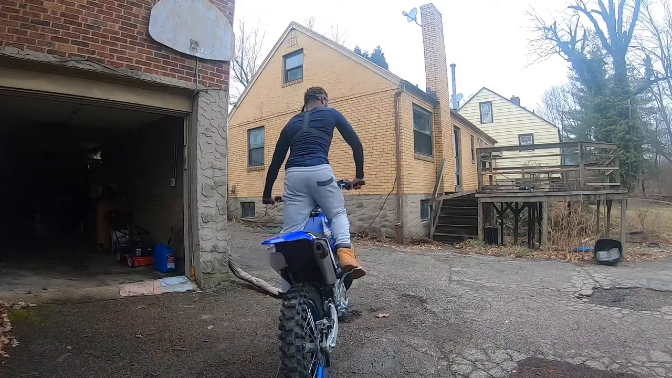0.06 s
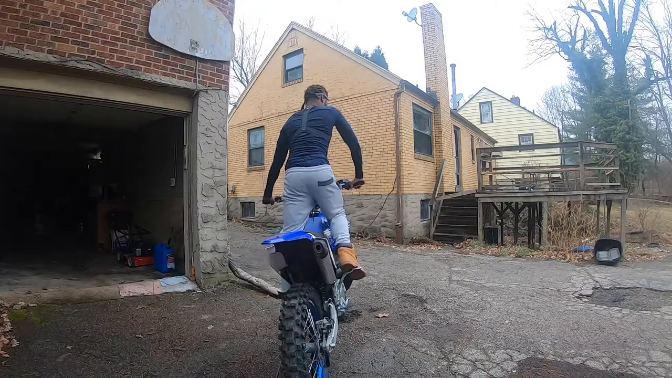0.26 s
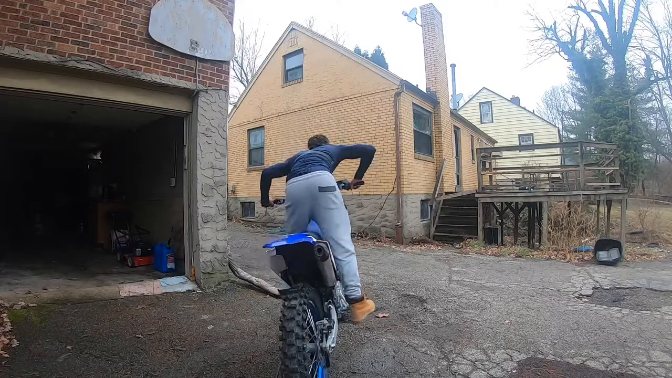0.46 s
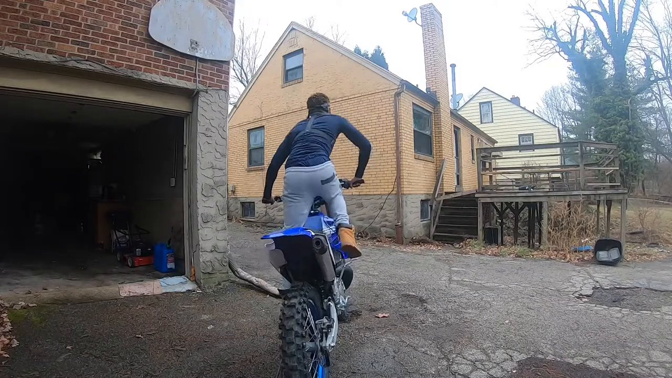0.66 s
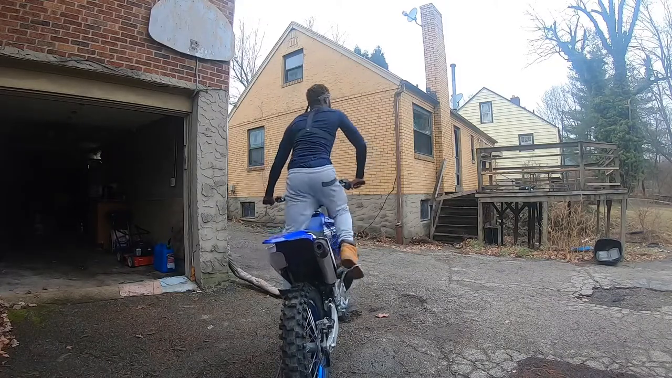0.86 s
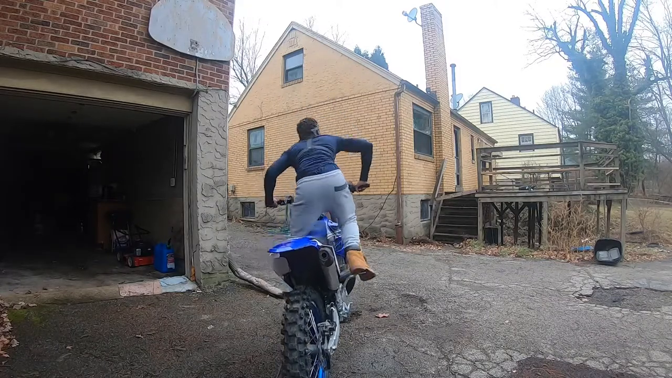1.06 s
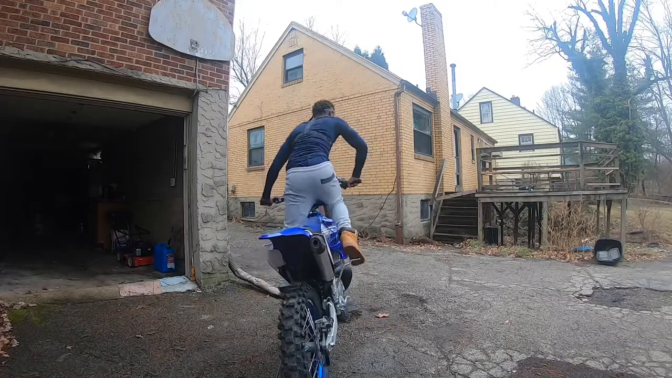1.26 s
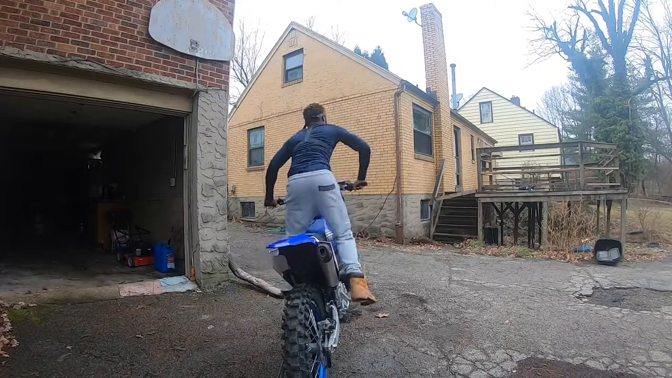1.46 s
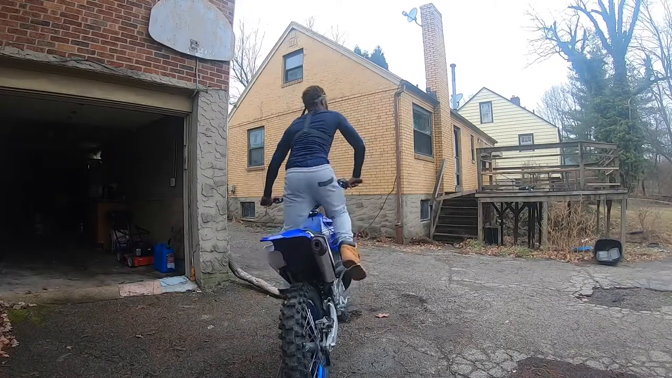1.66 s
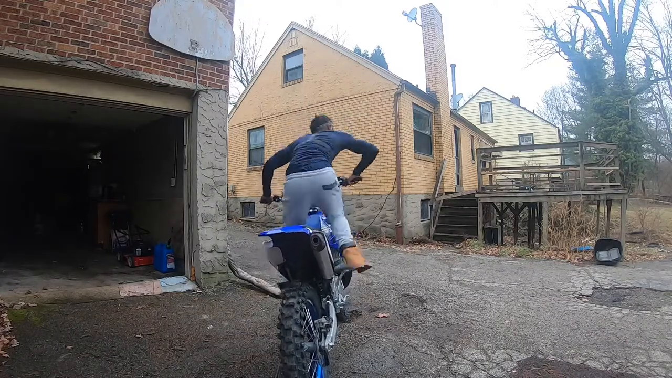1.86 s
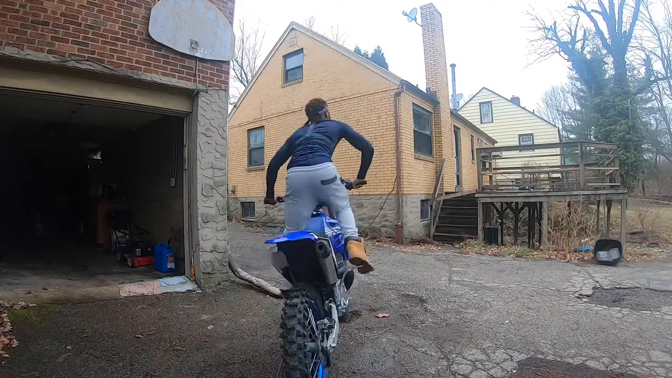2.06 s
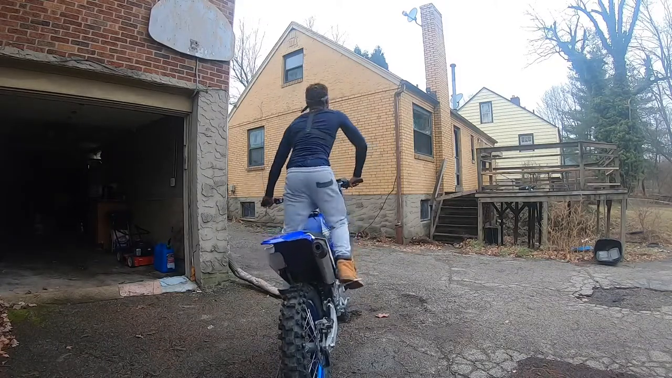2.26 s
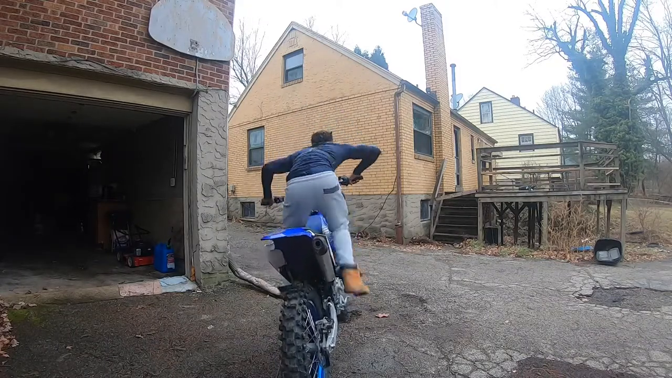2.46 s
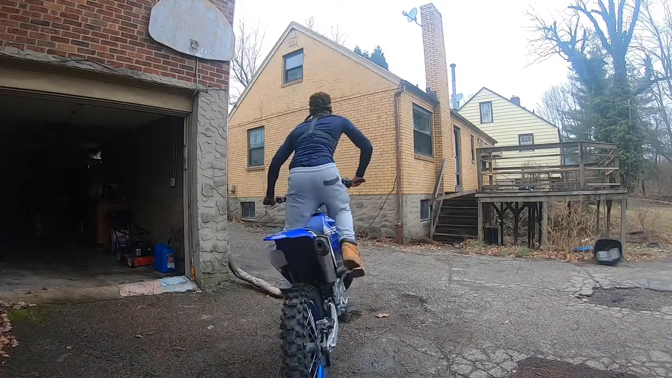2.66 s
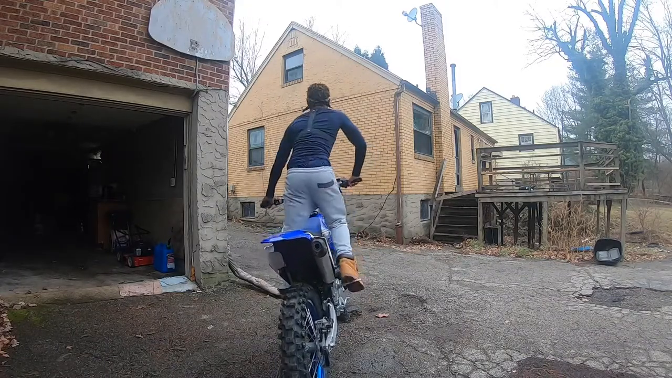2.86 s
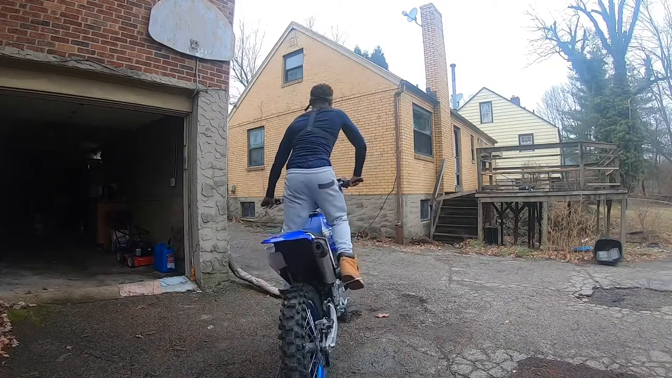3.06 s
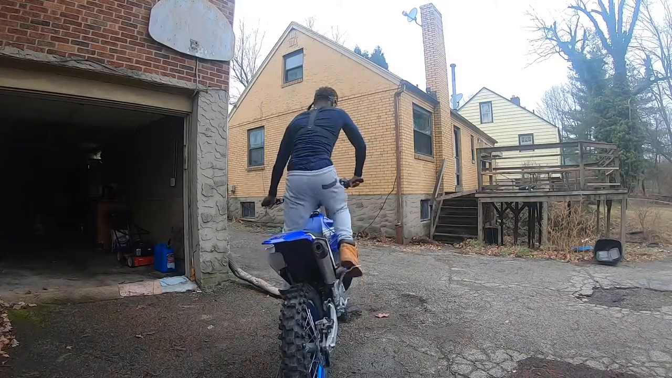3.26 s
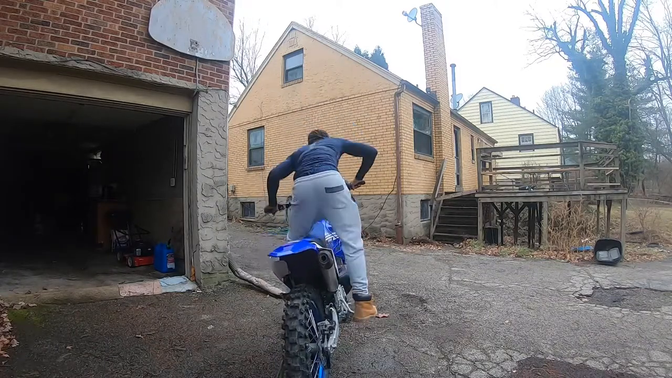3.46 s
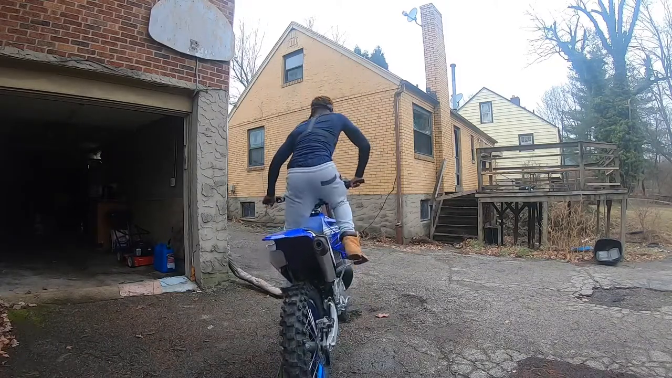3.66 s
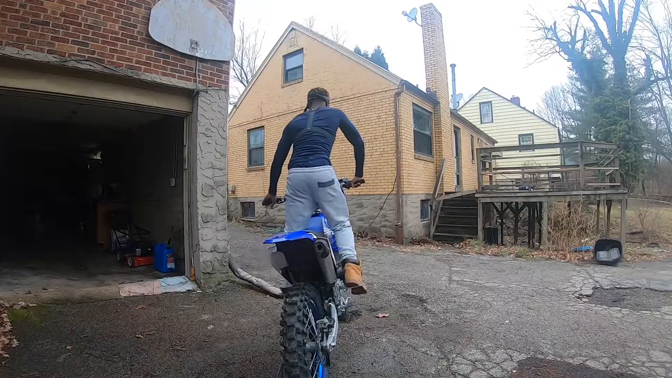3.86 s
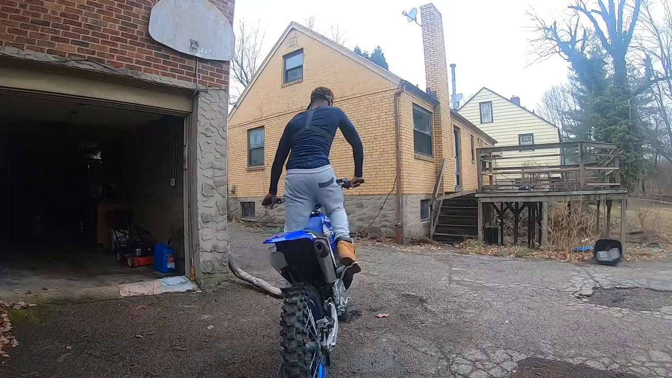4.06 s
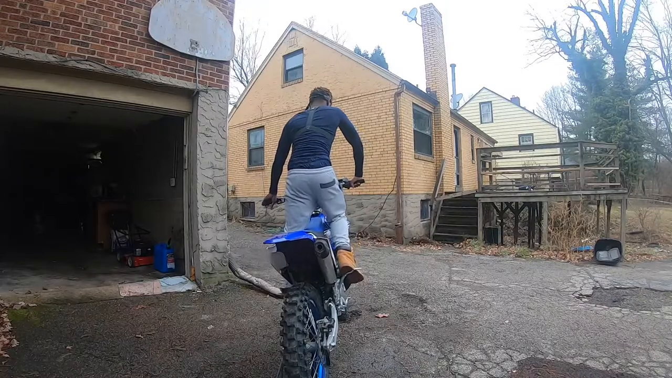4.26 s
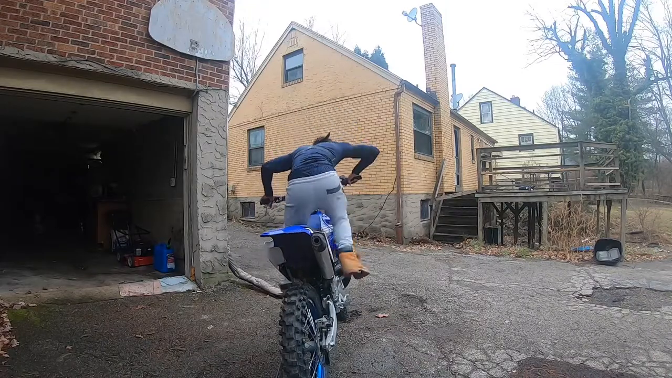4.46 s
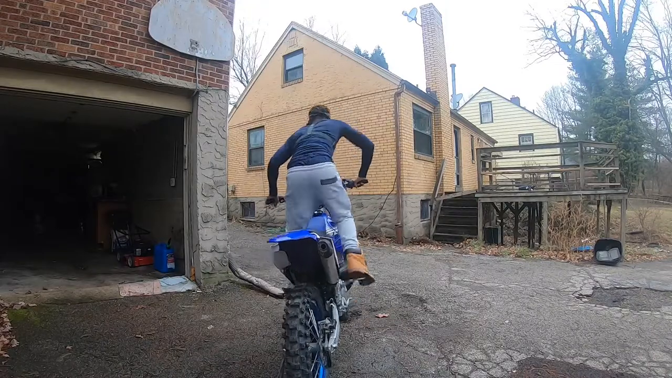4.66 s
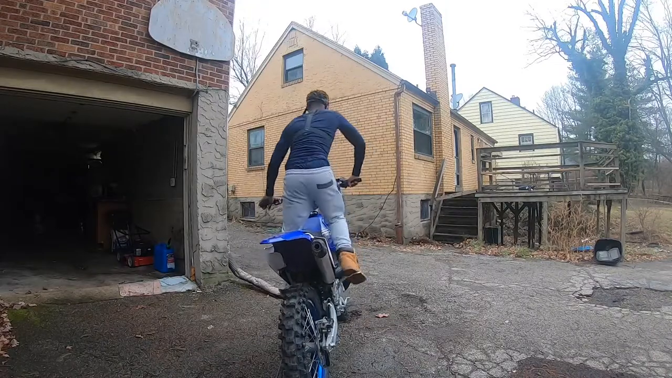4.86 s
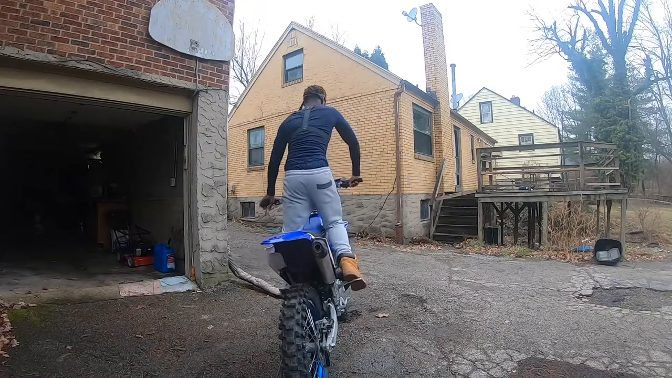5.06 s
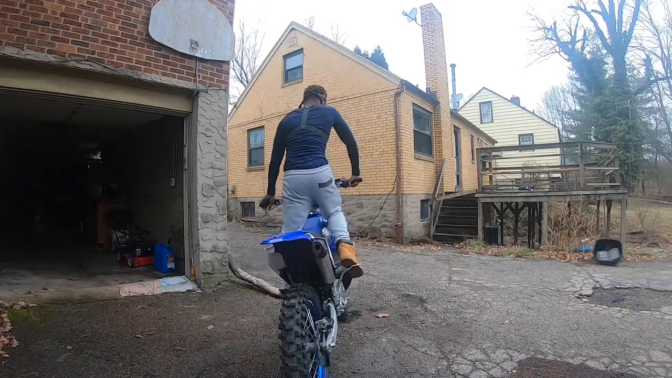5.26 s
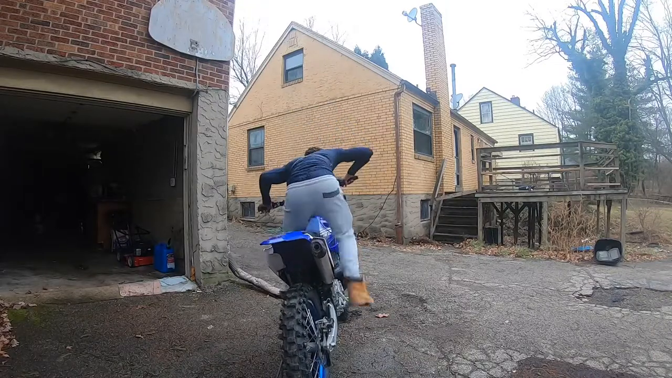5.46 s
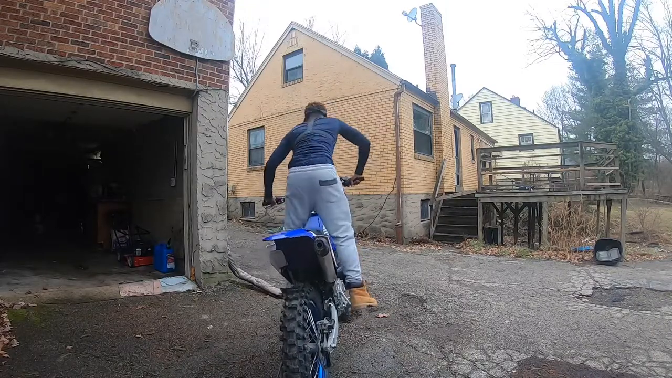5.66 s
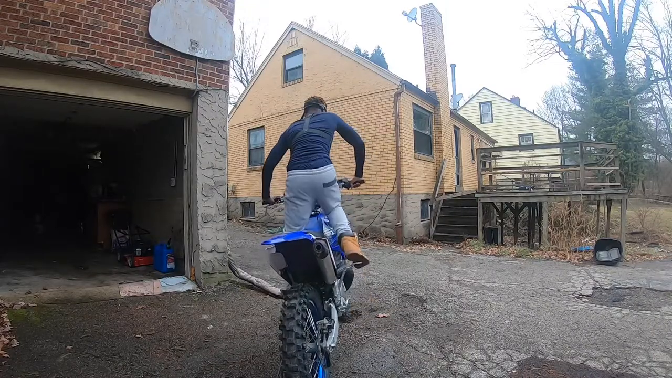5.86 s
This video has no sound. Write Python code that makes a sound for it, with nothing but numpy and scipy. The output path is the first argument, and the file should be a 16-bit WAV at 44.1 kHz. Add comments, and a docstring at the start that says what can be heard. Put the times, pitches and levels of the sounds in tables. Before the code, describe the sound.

Outdoors by an open garage, a dirt bike is kicked over seven times without starting. Each fast stroke is a gear bite, a grinding whirr with a few hollow puffs in the exhaust, then a bright metal clack and chatter. The lever ratchets back in small clicks, with brief rising hoots of drawn air. Close, mostly dry mono pickup, quiet air and a faint bird.

```python
"""A two-stroke dirt bike is kicked over seven times in a driveway between brick walls and never fires.
Each kick: the starter gear touches and bites in noise bursts, gear grains whirr, pulses puff down the ringing
exhaust, and the lever clacks on its stop and chatters. Then the lever ratchets back up in short cracks while
the slowing engine draws air through the reed valve in rising tones. A far bird calls now and then; air
noise lies under it all."""
import sys
import numpy as np
from scipy import signal
from scipy.fft import rfft, irfft, next_fast_len
from scipy.io import wavfile
from scipy.ndimage import uniform_filter1d

SR = 44100
rng = np.random.default_rng(int(sys.argv[2]) if len(sys.argv) > 2 else 0)


def file_out(sig):
    """Save sig as 16-bit WAV at sys.argv[1]."""
    # one column per channel
    cols = np.atleast_2d(sig).T
    # limit, then scale
    lim = np.clip(cols, -1, 1)
    pcm = np.round(lim * 32767).astype(np.int16)
    wavfile.write(sys.argv[1], SR, pcm)


N = 261072
TIME = np.arange(N) / SR


def from_db(db):
    """Decibels to gain."""
    return 10 ** (np.asarray(db) / 20)


def rms_one(x):
    """Scale to an rms of 1."""
    return x / np.sqrt(np.mean(x ** 2) + 1e-20)


def peak_one(x):
    """Scale so that the loudest millisecond has an rms of 1."""
    return x / np.sqrt(uniform_filter1d(x ** 2, size=44).max())


def add(out, s, sound):
    """Mix a sound in at time s."""
    at = max(round(s * SR), 0)
    out[at:at + len(sound)] += sound[:max(N - at, 0)]


def colour(x, tone, treble_db=0):
    """Causal (minimum-phase) filter with the given spectrum and a shelf on the treble."""
    size = 2 * next_fast_len(len(x))
    hz = np.maximum(np.arange(size // 2 + 1) * SR / size, 1)
    points_hz, points_db = np.transpose(tone)
    shelf = hz ** 2 / (hz ** 2 + 5000 ** 2)
    spectrum_db = np.interp(np.log(hz), np.log(points_hz), points_db) + treble_db * shelf
    # folding the cepstrum forward in time gives the minimum phase
    cepstrum = irfft(np.log(from_db(spectrum_db)))
    cepstrum[1:size // 2] *= 2
    cepstrum[size // 2 + 1:] = 0
    return irfft(rfft(x, size) * np.exp(rfft(cepstrum)))[:len(x)]


def noise(tone):
    """Steady coloured noise of rms 1."""
    return rms_one(colour(rng.standard_normal(N), tone))


def smooth_noise(shape, size):
    """Slow random wander of rms 1, averaged over size samples."""
    return rms_one(uniform_filter1d(rng.standard_normal(shape), size=size))


def grains(per_s, spread_db):
    """Random tiny contacts of uneven size."""
    contacts = rng.random(N) < per_s / SR
    signs = rng.choice([-1, 1], N)
    return contacts * signs * from_db(spread_db * np.minimum(rng.exponential(1, N), 4))


def loose_ticks(per_s, spread_db, length, decay_s):
    """Random contacts, each heard as a short dying burst of noise; length in samples."""
    tick = rng.standard_normal(length) * np.exp(-TIME[:length] / decay_s)
    return signal.fftconvolve(grains(per_s, spread_db), tick)[:N]


def ring(x, modes):
    """Decaying sines, one for each mode, set going by x."""
    out = np.zeros(N)
    for hz, db, t60 in modes:
        r = from_db(-60 / (t60 * SR))
        w = 2 * np.pi * hz / SR
        out += from_db(db) * signal.lfilter([0, np.sin(w)], [1, -2 * r * np.cos(w), r * r], x + 1e-18)
    return out


def swells(rows, fade_s):
    """Level curve of things that fade in, hold and fade out."""
    level = np.zeros(N)
    for start, end, db in rows:
        level += from_db(db) * np.clip(np.minimum(TIME - start, end - TIME) / fade_s, 0, 1)
    return level


def hits(rows, tone, crack_s, ring_s, ring_db, gain_db, rise_s):
    """Hard contact: a dense crack that dies in a moment, over a weaker, longer ring."""
    out, t = np.zeros(N), TIME[:SR // 10]
    decay = np.exp(-t / crack_s) + from_db(ring_db) * np.exp(-t / ring_s)
    shape = decay * (1 - np.exp(-(t / rise_s) ** 2))
    for s, db, *treble_db in rows:
        burst = colour(rng.choice([-1, 1], len(t)) * shape, tone, *treble_db)
        add(out, s, from_db(db + gain_db) * peak_one(burst))
    return out


# each down stroke ends on the lever's stop: (t/s, level/dB, treble/dB, wait before it chatters/s)
STOPS = [(.503, -5.5, -2.5, 0.03), (1.426, -4, 5.5, 0.025), (1.968, -5, 1, .022), (2.541, -8.5, 2.5, 0.014),
         (3.482, -6.5, 0, .034), (4.561, -7.5, -0.5, 0.038), (5.542, -7, -0.5, 0.013)]
# spectrum of the clack: (f/Hz, level/dB)
STOP_TONE = [(100, -21), (400, -15), (1100, 4), (1600, -6.5), (2600, -9.5), (3600, 3), (4500, -1.5),
             (5300, 4), (7000, -3), (8700, 0), (11000, -11), (13500, -11), (15000, -3.5), (16500, -16.5)]


def lever_stop():
    """The lever slams onto its stop with a bright crack and a short ring."""
    rows = [row[:-1] for row in STOPS]
    return hits(rows, STOP_TONE, crack_s=0.001, ring_s=0.011, ring_db=-22.5, gain_db=-0.5, rise_s=0.00047)


# the starter gear bites early in each stroke: (t/s, level/dB)
BITES = [(.44, -16.5), (1.369, -14), (1.909, -13.5), (2.489, -11), (3.422, -11.5), (4.51, -6.5),
         (5.479, -4)]
# spectrum of touch and bite: (f/Hz, level/dB)
TAKE_UP_TONE = [(88, -44), (150, -18.5), (361, -21), (702, 2.5), (1080, -3.5), (1340, 0), (2600, -9),
                (3490, -11), (3920, -6.5), (5150, -7), (5790, -14.5), (8560, -16), (10000, -21.5),
                (12400, -20.5), (16000, -24)]
# the touch is lighter than the bite; a harder bite sounds duller (dB of treble lost per dB of level)
TOUCH_DB, BITE_TREBLE_DB, BITE_DULLING = -11.5, -2.5, 0.75


def starter_gear():
    """The starter gear touches lightly at the start of the stroke, then bites."""
    rows = []
    for (start, *_), (bite, db) in zip(STROKES, BITES):
        treble_db = BITE_TREBLE_DB - BITE_DULLING * db
        rows += [(start, db + TOUCH_DB, treble_db), (bite, db, treble_db)]
    return hits(rows, TAKE_UP_TONE, crack_s=0.001, ring_s=.005, ring_db=-11.5, gain_db=-9.5, rise_s=0.00075)


# down strokes, one per kick:
# (t/s, whirr level/dB, coasting decay/s, each turn's length over the last, turns of the crank)
STROKES = [(.438, -29.5, .08, 1.2, 4), (1.358, -28, .065, 1.13, 4), (1.904, -30.5, .076, 1.04, 4),
           (2.481, -31, .055, 1.21, 3), (3.414, -28, .06, 1, 3), (4.498, -28.5, .068, 1.21, 4),
           (5.469, -29.5, .035, 1.23, 2)]
# spectrum of the grinding teeth: (f/Hz, level/dB)
WHIRR_TONE = [(35, -44.5), (60, -17.5), (527, -5.5), (822, 6), (1140, -10), (1410, 2), (1660, -9),
              (2300, -6), (2650, -19), (2900, -10), (4860, -20.5), (8510, -24), (10000, -23.5),
              (13600, -31), (16000, -34)]


def gears(rise_db, mesh_hz, mesh_depth, lumps_db):
    """Teeth grind unevenly, louder down the stroke, then the crank coasts to rest."""
    level, speed = np.zeros(N), np.zeros(N)
    for (start, db, coast_s, *_), (bottom, *_) in zip(STROKES, STOPS):
        travel = np.clip((TIME - start) / (bottom - start), 0, 1)
        coast = np.exp(-np.maximum(TIME - bottom, 0) / coast_s) * (TIME > start)
        level += from_db(db + rise_db * (travel - 1)) * coast
        speed += np.sqrt(travel * coast)
    # the tooth mesh slows with the gears
    mesh = 1 + mesh_depth * np.sin(2 * np.pi * mesh_hz * np.cumsum(speed) / SR)
    # the load comes and goes every few milliseconds
    load = from_db(lumps_db * smooth_noise(N, size=260))
    grind = grains(per_s=3500, spread_db=2.5) * mesh * load
    return level * rms_one(colour(grind, WHIRR_TONE))


# the crank: first puff after the kick starts, first turn and its unevenness, puff as the piston rocks back
FIRST_PUFF_S, TURN_S, TURN_UNEVEN_S, ROCK_BACK_S = .042, .0312, .001, 0.074
FIRST_PUFF_DB, PUFF_DB, PUFF_LOSS_DB, ROCK_BACK_DB = -17.5, -19, 0.5, -33


def puffs():
    """One puff per turn of the crank, each weaker, and a last one as it rocks back: (t/s, level/dB)."""
    rows = []
    for start, *_, slowing, turns in STROKES:
        s = start + FIRST_PUFF_S
        rows.append((s, FIRST_PUFF_DB))
        for k in range(round(turns) - 1):
            s += TURN_S * slowing ** k
            rows.append((s + TURN_UNEVEN_S * rng.uniform(-1, 1), PUFF_DB - PUFF_LOSS_DB * k))
        rows.append((s + ROCK_BACK_S, ROCK_BACK_DB))
    return rows


# spectrum of a puff: (f/Hz, level/dB)
PUFF_TONE = [(25, -29.5), (60, -13), (120, 5), (190, 6), (280, -5.5), (500, -2.5), (750, -8.5), (1050, -6),
             (2000, -20.5), (6000, -46.5)]
# the exhaust pipe rings: (f/Hz, level/dB, t60/s)
PIPE = [(123, -39.5, 0.062), (184, -35.5, 0.13), (255, -38, 0.043), (392, -29.5, .16), (576, -17, 0.065),
        (716, -25.5, .09), (766, -25, .037), (980, -24, .1)]


def exhaust(port_lag_s, first_port_db, pulse_db, pipe_db):
    """Each turn uncovers the exhaust port, then the transfer ports: a double pulse that rings the pipe."""
    pulses = np.zeros(N)
    for s, db in puffs():
        add(pulses, s - port_lag_s, -from_db([db + first_port_db]))
        add(pulses, s, -from_db([db]))
    return from_db(pulse_db) * colour(pulses, PUFF_TONE) + from_db(pipe_db) * ring(pulses, PIPE)


# spectrum of the lever's chatter and of loose parts: (f/Hz, level/dB)
CHATTER_TONE = [(500, -16.5), (1400, -18.5), (2500, -5.5), (4300, 1), (6500, -5.5), (9000, -7.5),
                (13000, -10), (15500, -10)]
# gap between bounces, first level, and loss at each bounce
BOUNCE_S, BOUNCE_DB, BOUNCE_LOSS_DB = .0095, -14, 1.35


def lever_bounces(count, uneven_db):
    """The lever chatters unevenly on its stop, tending to weaken from bounce to bounce."""
    rows = []
    for stop, *_, delay in STOPS:
        for k, (late, strong) in enumerate(rng.uniform(-1, 1, (count, 2))):
            s = stop + delay + BOUNCE_S * (k + .2 * late)
            rows.append((s, BOUNCE_DB - BOUNCE_LOSS_DB * k + uneven_db * strong))
    return hits(rows, CHATTER_TONE, crack_s=0.00099, ring_s=.007, ring_db=-17.5, gain_db=-7.0, rise_s=0.00068)


def clatter(per_s, fade_s, gain_db):
    """The blow on the stop jolts loose parts, which tick on ever more faintly."""
    jolt = np.zeros(N)
    for s, db, *_ in STOPS:
        jolt += from_db(db + gain_db) * np.exp(-np.abs(TIME - s) / fade_s) * (TIME > s)
    ticks = loose_ticks(per_s, spread_db=2.5, length=300, decay_s=0.00083)
    return jolt * rms_one(colour(ticks, CHATTER_TONE))


# the frame takes the rider's weight with a clunk: (t/s, level/dB)
CLUNKS = [(3.522, -10), (4.608, -8.5), (5.584, -2.5)]
# the frame's modes: (f/Hz, level/dB, t60/s)
FRAME = [(172.5, -21.5, 0.062), (314, -38.5, .024), (445.6, -19.5, 0.058), (593.6, -1.5, 0.048),
         (749.7, -2.5, .045), (864, 7, 0.028), (980, -6, .052)]
CLUNK_CONTACT_S, REBOUND_S, REBOUND_DB = 0.00046, .0085, -5.5


def frame(gain_db, low_cut_hz):
    """A soft blow and one rebound ring the frame's low modes, with the deep bass cut away."""
    blows, t = np.zeros(N), TIME[:SR // 100]
    push = t * np.exp(-2 * t / CLUNK_CONTACT_S)
    push /= push.sum()
    for s, db in CLUNKS:
        add(blows, s, from_db(db + gain_db) * push)
        add(blows, s + REBOUND_S, from_db(db + gain_db + REBOUND_DB) * push)
    low_cut = signal.butter(2, low_cut_hz, "high", fs=SR, output="sos")
    return signal.sosfilt(low_cut, ring(blows, FRAME))


# runs of ratchet teeth as the lever moves freely: (first tooth t/s, teeth (rounded for the count),
# first gap/s, each gap over the last, level/dB, treble/dB, scrape level/dB)
RATCHET_RUNS = [(0.624, 4.8, .0096, 1, -20.5, 3, -46), (0.7743, 3.38, 0.0064, 2.14, -29.5, 1, -54),
                (0.9405, 2.3, 0.036, 1, -31.5, -6.5, -59), (1.544, 4.72, 0.0097, 1.16, -21.5, 5, -44),
                (1.6898, 2.26, .023, 1, -28.5, -19, -54), (2.0888, 4.03, 0.013, 1.03, -22.5, 0, -55),
                (2.208, 2.28, .0254, 1.19, -34, -11, -54), (2.4074, 2, 0.034, 1, -27, -0.5, -59),
                (2.6719, 4.1, 0.028, 0.84, -23, 1.5, -53), (3.2964, 2.42, 0.031, 0.88, -24.5, -1, -57),
                (3.6365, 2, .0275, 1, -24.5, 2, -51), (4.0075, 2, 0.036, 1, -24.5, 6, -57),
                (4.7129, 4, .0155, 1.2, -22, 3, -46), (5.2988, 2, 0.032, 1, -23.5, 0.5, -55),
                (5.79, 3.72, 0.022, 0.97, -22, 1, -49), (5.8797, 2.57, 0.031, 0.89, -25.5, 4, -56)]
# a single tooth slips: (t/s, level/dB, treble/dB)
LONE_TEETH = [(.6777, -28, -6), (1.176, -32, 2), (1.272, -34.5, -12.5), (2.8248, -28.5, -20.5),
              (3.687, -20.5, 2), (4.1751, -29.5, -17), (4.4241, -33, -8), (4.8565, -33.5, -19),
              (5.3546, -30, -20)]
# spectrum of a tooth: (f/Hz, level/dB)
RATCHET_TONE = [(300, -23), (800, -5.5), (1350, 2.5), (1800, -9), (3000, -2), (4500, 1), (6200, -2),
                (8000, -1.5), (10500, -4), (13000, -8), (16000, -14)]


def ratchet(uneven_db):
    """Teeth slip past at gaps that widen or close with the lever's speed."""
    rows = list(LONE_TEETH)
    for s, count, gap_s, slowing, db, treble_db, _ in RATCHET_RUNS:
        for k in range(round(count)):
            rows.append((s, db + uneven_db * rng.standard_normal(), treble_db))
            s += gap_s * slowing ** k
    return hits(rows, RATCHET_TONE, crack_s=0.00091, ring_s=0.005, ring_db=-15, gain_db=-6.5, rise_s=.0014)


# reed valve hoots: (t/s, length/s, mean f/Hz, level/dB)
HOOTS = [(0.673, 0.025, 763, -35), (0.806, 0.029, 778, -34.5), (0.991, 0.028, 787, -34.5),
         (1.65, 0.023, 697, -33), (1.72, .032, 783, -36.5), (2.146, .015, 567, -37),
         (2.28, 0.041, 784, -35.5), (2.654, .032, 668, -34), (2.899, .038, 770, -36),
         (3.157, 0.0067, 590, -40.5), (3.623, .0325, 756, -36.5), (3.879, 0.038, 765, -35),
         (4.186, 0.018, 682, -38.5), (4.688, 0.029, 755, -38), (4.933, 0.038, 763, -37),
         (5.687, 0.02, 687.6, -32.5)]
HOOT_RISE_HZ_PER_S = 4400  # averaged over the hoot; the pitch climbs fastest at its start


def reed_valve(swell_db, release_s, waver, flutter_db, second_db, third_db, gain_db):
    """Drawn air sets the reeds fluttering: an unsteady tone that rises, swells and stops."""
    out, t = np.zeros(N), TIME[:SR // 10]
    attack = 1 - np.exp(-t / 0.0012)
    for s, length, mean_hz, db in HOOTS:
        along = np.clip(t / length, 0, 1)
        jitter, flutter = smooth_noise((2, len(t)), size=130)
        # the mean of a square-root climb is 2/3
        hz = mean_hz + HOOT_RISE_HZ_PER_S * length * (np.sqrt(along) - 2 / 3)
        phase = 2 * np.pi * np.cumsum(hz * (1 + waver * jitter)) / SR
        release = np.exp(-np.maximum(t - length, 0) / release_s)
        level = attack * from_db(swell_db * (along - 2.5) + flutter_db * flutter) * release
        wave = np.sin(phase)
        wave += from_db(second_db) * np.sin(2 * phase)
        wave += from_db(third_db) * np.sin(3 * phase)
        add(out, s, from_db(db + gain_db) * level * wave)
    return out


# low moans of air in the pipe: (start t/s, end t/s, level/dB)
MOANS = [(2.16, 2.29, -50), (2.74, 2.87, -50.5), (4.68, 4.93, -57)]
# spectrum of a moan: (f/Hz, level/dB)
MOAN_TONE = [(40, -30), (110, -15), (138, -5), (165, -6), (210, -40), (600, -48.5)]


def pipe_moans():
    """Air moans low in the pipe as the piston rocks back: swells of narrow noise."""
    return swells(MOANS, fade_s=0.025) * noise(MOAN_TONE)


# further knocks of play in the gears, apart from those around the hoots: (t/s, level/dB)
KNOCKS = [(.709, -30.5), (.764, -29), (.797, -21.5), (1.184, -34.5), (1.552, -29), (1.614, -30),
          (1.716, -31), (2.109, -28), (2.237, -23), (2.761, -33), (2.8, -34), (3.721, -28), (3.794, -24.5),
          (4.443, -36.5), (4.797, -34.5)]
# spectrum of the knocks: (f/Hz, level/dB)
BACKLASH_TONE = [(200, -19), (600, -5), (1000, -3.5), (1350, 4.5), (1800, -10.5), (2300, -9), (3100, -10),
                 (4000, -16), (10000, -33)]
# play in the gears closes before each hoot and again after it; the longer the piston rocks, the harder
PLAY_BEFORE_S, PLAY_BEFORE_DB, PLAY_AFTER_S, PLAY_AFTER_DB = .029, -34.5, 0.038, -35.5
FULL_ROCK_S, PLAY_DB_PER_S = 0.041, 450


def backlash():
    """Dull knocks of play in the gears: some on their own, some on either side of each hoot."""
    rows = list(KNOCKS)
    for s, length, *_ in HOOTS:
        swing_db = PLAY_DB_PER_S * (length - FULL_ROCK_S)
        rows.append((s - PLAY_BEFORE_S, PLAY_BEFORE_DB + swing_db))
        rows.append((s + length + PLAY_AFTER_S, PLAY_AFTER_DB + swing_db))
    return hits(rows, BACKLASH_TONE, crack_s=0.005, ring_s=0.023, ring_db=-16.5, gain_db=-6.0, rise_s=0.0013)


# the boot shifts on the lever: (start t/s, end t/s, level/dB)
BOOT_SCRAPES = [(0.381, 0.476, -52.5), (.97, 1.067, -48), (1.1, 1.22, -46), (1.288, 1.37, -54.5),
                (1.825, 1.935, -51.5)]
# the lever scrapes a little before and after each run of teeth, the piston around each hoot
LEVER_LEAD_S, LEVER_LAG_S = 0.025, 0.046
PISTON_LEAD_S, PISTON_LAG_S, PISTON_RUB_DB = 0.046, 0.041, -57.5


def scrapes():
    """Whatever moves rubs: lever, piston and boot: (start t/s, end t/s, level/dB)."""
    rows = list(BOOT_SCRAPES)
    for first, count, gap_s, *_, db in RATCHET_RUNS:
        rows.append((first - LEVER_LEAD_S, first + (count - 1) * gap_s + LEVER_LAG_S, db))
    for s, length, *_ in HOOTS:
        rows.append((s - PISTON_LEAD_S, s + length + PISTON_LAG_S, PISTON_RUB_DB))
    return rows


# spectrum of the rubbing: (f/Hz, level/dB)
RUB_TONE = [(100, -16.5), (400, -6), (700, 10.5), (1400, 3), (1900, 7), (4500, -3.5), (8000, -5),
            (15000, -19.5)]


def scraping(rattle_db, treble_db):
    """Gritty friction, with loose parts ticking in it."""
    grit = rms_one(colour(grains(per_s=7900, spread_db=-1.0), RUB_TONE, treble_db))
    ticks = loose_ticks(per_s=140, spread_db=5.5, length=400, decay_s=0.0018)
    rattle = from_db(rattle_db) * rms_one(colour(ticks, RUB_TONE))
    return swells(scrapes(), fade_s=0.071) * rms_one(grit + rattle)


# the engine cases ring: (f/Hz, level/dB, t60/s)
CASES = [(1407, -40.5, .04), (1913, -57.5, .05), (2391, -50, 0.09), (3120, -48.5, .1), (3473, -56.5, .04),
         (4130, -55.5, .06), (4630, -46.5, .06), (5546, -56.5, .03), (8900, -50, .025)]


def engine_cases(metal):
    """Every metal contact sets the modes of the engine cases ringing."""
    return ring(metal, CASES)


# echoes from ground, bike and wall: (delay t/s, level/dB)
ECHOES = [(.0047, -33.5), (.0098, -27), (0.0164, -26.5)]
# spectrum of the scatter: (f/Hz, level/dB)
YARD_TONE = [(60, -7), (200, 7.5), (700, -1), (2000, 1), (5000, -0.5), (10000, 0), (16000, -7.5)]


def driveway(x, t60, wet_db, garage_t60, garage_db):
    """A few near echoes, scatter from the walls and a faint long tail from the open garage."""
    t = TIME[:SR]
    decay = from_db(wet_db - 60 * t / t60) + from_db(garage_db - 60 * t / garage_t60)
    build_up = 1 - np.exp(-t / 0.006)
    response = colour(rng.standard_normal(SR) * decay * build_up, YARD_TONE)
    for s, db in ECHOES:
        add(response, s, from_db([db]))
    return x + signal.fftconvolve(x, response)[:N]


# a small bird far off: (t/s, level/dB)
BIRD = [(.12, -69), (0.291, -62.5), (3.07, -65), (3.879, -63.5), (5.0, -61), (5.22, -66)]


def bird(length_s, top_hz, end_hz, trill):
    """Thin, buzzy calls that fall in pitch; length and pitch vary at random around the settings."""
    out, t = np.zeros(N), TIME[:SR // 5]
    for s, db in BIRD:
        along = np.clip(t / (length_s * rng.uniform(.6, 1.9)), 0, 1)
        buzz = smooth_noise(len(t), size=30)
        fall_hz = top_hz + (end_hz - top_hz) * np.sqrt(along)
        hz = fall_hz * (rng.uniform(0.84, 1.02) + trill * buzz)
        level = from_db(db) * np.sin(np.pi * np.sqrt(along))
        add(out, s, level * np.sin(2 * np.pi * np.cumsum(hz) / SR))
    return out


# spectrum of the outdoor air: (f/Hz, level/dB)
AIR_TONE = [(15, -32), (25, -4), (229, -4.5), (354, -10.5), (476, -13), (545, -17), (591, -17), (1290, -19),
            (1740, -16.5), (2160, -20), (5880, -34), (7310, -33), (7920, -38.5), (9570, -34.5),
            (16000, -45.5)]
AIR_DB = -58


def outdoor_air():
    """Quiet, steady noise, strongest in the bass."""
    return from_db(AIR_DB) * noise(AIR_TONE)


def scene():
    """The bike in its driveway over quiet outdoor air."""
    metal = lever_stop() + starter_gear()
    metal += lever_bounces(count=4, uneven_db=-2)
    metal += clatter(per_s=260, fade_s=0.031, gain_db=-24.5)
    metal += ratchet(uneven_db=.6)
    knocks = frame(gain_db=-3.5, low_cut_hz=360) + backlash()
    engine = gears(rise_db=7.0, mesh_hz=799, mesh_depth=0.35, lumps_db=5.5)
    engine += exhaust(port_lag_s=.0014, first_port_db=-8, pulse_db=27.0, pipe_db=5.5)
    engine += reed_valve(swell_db=2, release_s=0.00052, waver=0.04, flutter_db=3.5,
                         second_db=-18, third_db=-25, gain_db=2.5)
    engine += pipe_moans()
    bike = metal + engine_cases(metal) + knocks + engine + scraping(rattle_db=6.5, treble_db=1.0)
    yard = driveway(bike, t60=0.18, wet_db=-39.5, garage_t60=0.46, garage_db=-61.5)
    outdoors = bird(length_s=0.064, top_hz=10500, end_hz=6600, trill=0.085) + outdoor_air()
    return (yard + outdoors)[None]


CUTOFF_HZ = 16200


def record(dry):
    """The highest peaks are rounded and the top is cut."""
    rounded = np.tanh(dry / .9) * .9
    top_cut = signal.ellip(10, .1, 90, CUTOFF_HZ, fs=SR, output="sos")
    return signal.sosfilt(top_cut, rounded)


dry = scene()
out = record(dry)
file_out(out)
```